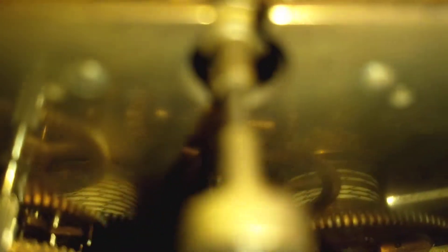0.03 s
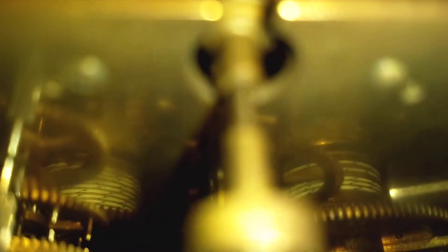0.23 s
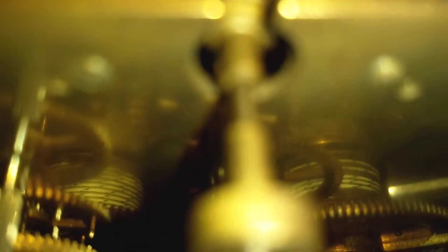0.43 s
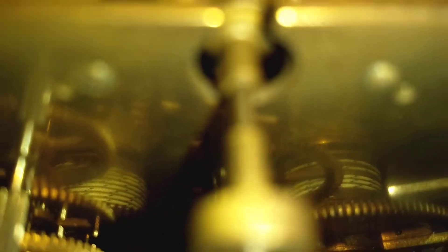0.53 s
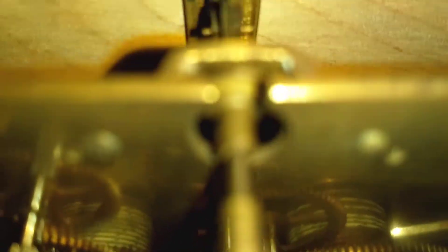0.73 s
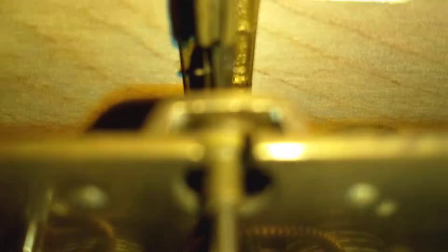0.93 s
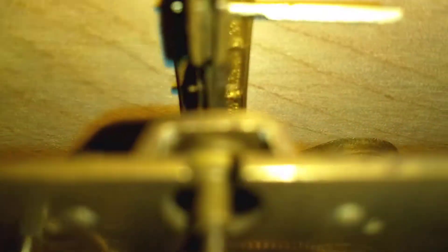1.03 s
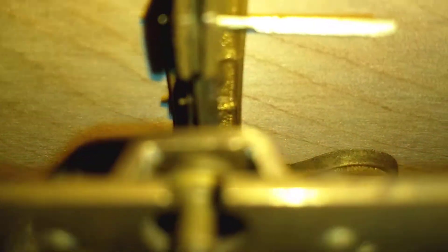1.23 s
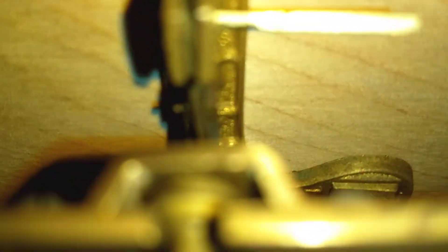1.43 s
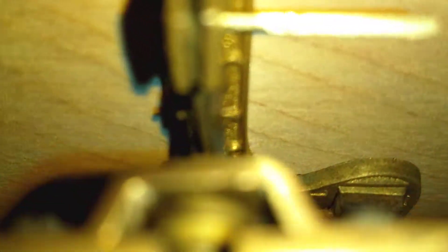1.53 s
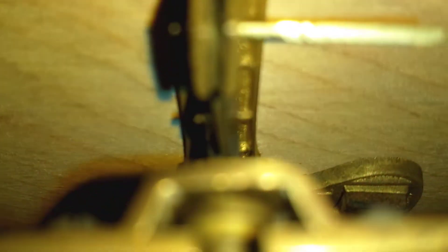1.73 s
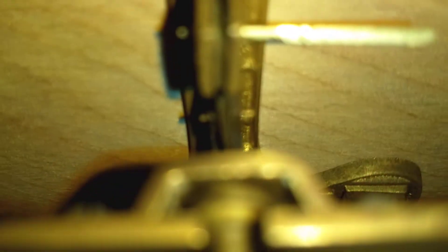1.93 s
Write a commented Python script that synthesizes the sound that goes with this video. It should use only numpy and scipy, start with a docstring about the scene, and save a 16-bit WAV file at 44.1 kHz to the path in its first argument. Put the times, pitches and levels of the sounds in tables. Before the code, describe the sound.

Sharp, slow metallic clockwork ticks among small knocks and hissing scrapes from handling.

```python
"""Brass clock in the hand

A small brass movement ticks up close: each beat is a tooth sliding on the pallet and landing with a
crack that rings the metal. Between beats the wheels click lightly and a thin spring sings. Handling
adds bumps that dive in pitch and run into hissing scrapes, all over a bed of low hum and hiss.
Close sounds reach the left channel inverted and a little late; the hum is alike on both sides."""
import sys
import numpy as np
from scipy.fft import rfft, irfft, next_fast_len
from scipy.io import wavfile
from scipy.ndimage import map_coordinates

SR = 44100
rng = np.random.default_rng(int(sys.argv[2]) if len(sys.argv) > 2 else 0)


def inscribe(sig):
    """Save sig as 16-bit PCM at rate SR to the path in sys.argv[1].

    A 1-D sig is mono; a 2-D sig holds one channel per row.
    Samples are clipped to [-1, 1] before scaling.
    """
    pcm = np.round(np.clip(np.atleast_2d(sig).T, -1, 1) * 32767)
    wavfile.write(sys.argv[1], SR, pcm.astype(np.int16))


N = 88200

# partials of the hum (f/Hz, rms level/dB, phase wander/rad)
HUM_PARTIALS = [(120.9, -62.5, 0.12), (171.9, -62, 0.091), (260, -68.5, 1.1), (288, -69.5, 0.48),
                (336.6, -73, 0.88), (429.3, -70, 1.17)]
# low room tone (f/Hz, level/dB)
ROOM_EQ = [(40, -43), (100, -0.5), (160, 0), (280, 4), (400, -7.5), (620, -4.5), (850, -9), (1300, -18.5),
           (2100, -99), (8000, -31)]
# steady hiss bed (f/Hz, level/dB)
BED_EQ = [(20, -3), (35, -21), (55, 4), (85, 2), (150, 0), (400, -12), (1300, -14), (2100, -19.5),
          (2600, -18), (4500, -20.5), (8000, -23.5), (15500, -26.5)]
# light clicks of the wheels (t/s, level/dB, t60/s)
WHEEL_CLICKS = [(.001, -52, 0.3), (0.2072, -45.5, 0.2), (0.491, -45.5, 0.16), (1.018, -45, 0.087),
                (1.5135, -45, 0.1), (1.528, -55, 0.27), (1.666, -53.5, 0.2)]
# colour of those clicks (f/Hz, level/dB)
WHEEL_EQ = [(200, -20), (900, -9), (1200, -4.5), (1400, 2), (1650, -3.5), (2000, -7), (2250, -20),
            (2600, 3.5), (3200, -18), (5000, -29), (14000, -39)]
# peaks of the spring's singing (t/s, level/dB)
SPRING_SWELLS = [(0.052, -55), (.548, -54.5), (1.025, -51), (1.095, -53.5), (1.59, -55)]
# beats of the escapement (t/s, frame level/dB, anchor level/dB, pallet level/dB, crack level/dB)
ESCAPEMENT_BEATS = [(.2248, -28.5, -28.5, -44, -36.5), (0.9717, -29.5, -26.5, -45.5, -31),
                    (1.7, -30, -29, -43, -35.5)]
# a tooth sliding on the pallet (f/Hz, level/dB)
SLIDE_EQ = [(1000, -1), (4000, 6), (9000, -17), (15000, -11)]
# high ring of the steel pallet (f/Hz, level/dB, t60/s)
PALLET_MODES = [(8500, -9, 0.029), (9100, -6, 0.028), (11180, -3.5, 0.056), (12300, -6, 0.034),
                (14200, -16, 0.18)]
# crack of the tooth landing (f/Hz, level/dB)
CRACK_EQ = [(200, -3), (700, -10.5), (1200, 1.5), (2000, -0.5), (2700, 16), (4200, -19.5), (5500, -4),
            (9000, -17), (16000, -22)]
# ring of the anchor; the lowest two modes beat (f/Hz, level/dB, t60/s)
ANCHOR_MODES = [(2452, 4.5, 0.049), (2640, 2, 0.014), (2877, -20, 0.061), (3240, -17.5, 0.058),
                (3554, -16.5, 0.077), (4350, -22.5, 0.049)]
# ring of the brass frame (f/Hz, level/dB, t60/s)
FRAME_MODES = [(953, -9.5, 0.051), (1154, -4.5, 0.079), (1204.6, -11.5, 0.14), (1498, -9.5, 0.081),
               (1725, -19.5, 0.084), (2036, -18, 0.068)]
# the case ringing on after a beat (f/Hz, level/dB)
CASE_EQ = [(200, -60), (1000, -16), (1400, 5.5), (1750, 1), (2200, -28.5), (2550, 6), (3200, -12),
           (5000, -23), (14000, -22)]
# handling scrapes (t/s, rise/s, time until the fade/s, t60/s, hiss level/dB, rasp level/dB)
SCRAPE_STROKES = [(0.2304, 0.0014, .011, .04, -41.5, -34.5), (0.425, 0.0031, 0.059, 0.035, -38, -37),
                  (0.558, 0.0016, 0.032, 0.22, -41.5, -40), (0.567, 0.031, 0.062, 0.25, -33.5, -52.5),
                  (0.698, 0.034, 0.12, 0.098, -45, -63.5), (0.866, 0.047, 0.049, 0.14, -55, -82),
                  (1.036, 0.0016, 0.012, 0.043, -51.5, -51), (1.051, 0.0012, 0.0032, 0.21, -38, -52),
                  (1.325, 0.0017, 0.0028, 0.16, -55, -58), (1.337, 0.051, 0.046, .14, -45, -57.5),
                  (1.434, .02, 0.034, 0.18, -60, -75), (1.745, 0.0026, .005, 0.16, -50.5, -56),
                  (1.763, 0.0078, .02, 0.54, -61, -60), (1.95, 0.035, 0.056, .1, -57.5, -80)]
# fine hiss of a scrape (f/Hz, level/dB)
SCRAPE_EQ = [(200, -29), (2000, -22), (3300, -1), (4500, 2), (5400, 2), (6500, 2.5), (8500, 5.5),
             (9700, -5.5), (11500, -11), (15500, -15)]
# lower rasp of a hard scrape (f/Hz, level/dB)
RASP_EQ = [(60, -5.5), (200, -1.5), (850, -0.5), (1500, -5.5), (2500, -5.5), (4000, -13.5), (8000, -11.5),
           (16000, -29)]
# handling bumps (t/s, level/dB, first f/Hz, last f/Hz, glide/s, t60/s, snap level/dB, spike level/dB)
HANDLING_BUMPS = [(.234, -19.5, 785, 98, .001, 0.018, -19.5, -12.5),
                  (0.4239, -15.5, 833, 165, 0.0011, 0.018, -31, -34),
                  (.5603, -18.5, 690, 180, 0.00093, 0.024, -24.5, -28.5),
                  (1.0518, -22.5, 310, 52, 0.0049, 0.056, -27.5, -31.5),
                  (1.3205, -36, 1000, 150, 0.0014, 0.015, -38.5, -37.5)]
# snap at the front of a bump (f/Hz, level/dB)
SNAP_EQ = [(100, -7.5), (1300, -3), (3000, -5), (8000, -10.5), (10000, -21), (15000, -24)]
# stereo width: the noise each channel has to itself (f/Hz, level/dB)
WIDTH_EQ = [(100, 3), (800, 6), (1700, -3), (2150, -59), (2600, -5), (3500, 1), (4200, 4.5), (8500, 1),
            (10000, 3.5), (15500, 2)]
# duller tone of close sounds on the left (f/Hz, level/dB)
LEFT_EQ = [(100, -2.5), (1000, -0.5), (1900, -1), (2300, -1.5), (2700, 0), (3600, -2), (4800, -3),
           (8500, -6), (10500, -3.5), (12000, -3), (15500, -7)]

TICK_WIDTH_DB, HANDLING_WIDTH_DB = -4, -4.5


def amp(db):
    """Decibels to gain."""
    return 10 ** (np.asarray(db) / 20)


def since(s):
    """Seconds since time s, zero before it."""
    return np.maximum(np.arange(N) / SR - s, 0)


def decay(s, t60):
    """A hard attack at s, then a fall of 60 dB every t60 seconds."""
    return (since(s) > 0) * amp(-60 * since(s) / t60)


def wobble(rate):
    """A smooth random curve, rate knots a second."""
    return map_coordinates(rng.standard_normal(int(N * rate / SR) + 4), [np.arange(N) * rate / SR])


def eq_gain(eq, hz):
    """Gain of an EQ curve drawn on a log frequency axis."""
    freqs, db = np.transpose(eq)
    return amp(np.interp(np.log(hz + 1), np.log(freqs + 1), db))


def filtered(x, response):
    """Shape x with a complex frequency response."""
    size = next_fast_len(N + SR // 2)
    return irfft(rfft(x, size) * response(np.fft.rfftfreq(size, 1 / SR)), size)[..., :N]


def noise(eq, width_db):
    """Coloured stereo noise of rms 1; width_db turns up the part the channels do not share."""
    own = filtered(rng.standard_normal((2, N)), lambda hz: amp(width_db) * eq_gain(WIDTH_EQ, hz))
    coloured = filtered(rng.standard_normal(N) + own, lambda hz: eq_gain(eq, hz))
    return coloured / np.sqrt(np.mean(coloured ** 2) + 1e-20)


def room():
    """A slightly unsteady hum over low room tone."""
    hum = sum(amp(db) * np.sqrt(2) * np.sin(2 * np.pi * hz * since(0) + wander * wobble(12))
              for hz, db, wander in HUM_PARTIALS)
    return hum + amp(-58.5) * noise(ROOM_EQ, width_db=-12)


def hiss_bed():
    """A soft, steady hiss with a full low end."""
    return amp(-55.5) * noise(BED_EQ, width_db=-15)


def wheels():
    """Light clicks of the wheels rattle the case."""
    return noise(WHEEL_EQ, TICK_WIDTH_DB) * sum(amp(db) * decay(s, t60) for s, db, t60 in WHEEL_CLICKS)


def spring(pitch_hz=1390, swell_s=0.017):
    """A thin spring sings one wavering note in brief swells."""
    t = since(0)
    swells = sum(amp(db) * np.exp(-((t - s) / swell_s) ** 2) for s, db in SPRING_SWELLS)
    return swells * np.sin(2 * np.pi * pitch_hz * t + 1.1 * wobble(70))


def ring(modes, s, attack_s=0.001):
    """Metal struck at s: damped modes, balanced a little differently on each hit."""
    t = since(s)
    tones = sum(amp(db + rng.normal()) * decay(s, t60) * np.sin(2 * np.pi * hz * t)
                for hz, db, t60 in modes)
    return tones * (1 - np.exp(-t / attack_s))


def escapement(lead_s=0.0019):
    """A tooth slides on the pallet, then lands with a crack that rings the anchor, frame and case."""
    crack, case, slide = (noise(eq, TICK_WIDTH_DB) for eq in (CRACK_EQ, CASE_EQ, SLIDE_EQ))
    out = np.zeros((2, N))
    for s, frame_db, anchor_db, pallet_db, crack_db in ESCAPEMENT_BEATS:
        out += amp(crack_db - 3) * slide * decay(s - lead_s, t60=0.022)
        out += amp(pallet_db) * ring(PALLET_MODES, s - lead_s)
        out += amp(crack_db) * crack * decay(s, t60=0.025)
        out += amp(anchor_db) * ring(ANCHOR_MODES, s)
        out += amp(frame_db) * ring(FRAME_MODES, s)
        out += amp(frame_db - 13.5) * case * decay(s, t60=0.21)
    return out


def scrapes():
    """Each stroke rises, holds and fades: a grainy hiss, with rasp and fizz when it presses hard."""
    hiss_env, rasp_env = np.zeros(N), np.zeros(N)
    for s, rise, length, t60, hiss_db, rasp_db in SCRAPE_STROKES:
        stroke = np.minimum(since(s) / rise, 1) * amp(-60 * since(s + length) / t60)
        hiss_env = np.hypot(hiss_env, amp(hiss_db) * stroke)  # overlaps add in power
        rasp_env = np.hypot(rasp_env, amp(rasp_db) * stroke)
    peak = hiss_env.max()
    fizz_env = amp(-5) * peak * (hiss_env / peak) ** 1.8  # louder strokes are brighter
    fizz = fizz_env * noise([(6000, -40), (11600, 0), (16000, -2)], width_db=6)
    grain = amp(0.5 * wobble(570))
    hiss = hiss_env * noise(SCRAPE_EQ, HANDLING_WIDTH_DB)
    rasp = rasp_env * noise(RASP_EQ, width_db=-11.5)
    return grain * (hiss + rasp + fizz)


def bumps(spike_s=0.00006):
    """Handling knocks: a spike and a snap on a thump whose pitch dives within milliseconds."""
    snap, out = noise(SNAP_EQ, HANDLING_WIDTH_DB), np.zeros((2, N))
    for s, db, first_hz, last_hz, glide, t60, snap_db, spike_db in HANDLING_BUMPS:
        t = since(s)
        cycles = last_hz * t + (first_hz - last_hz) * glide * (1 - np.exp(-t / glide))
        out += amp(spike_db) * t / spike_s * np.exp(1 - t / spike_s)
        out += amp(snap_db) * snap * decay(s, t60=0.0037)
        out += amp(db) * decay(s, t60) * np.sin(2 * np.pi * cycles)
    return out


def close_pickup(x, lag_s=0.000421):
    """Close sounds arrive inverted, late and duller on the left."""
    left = filtered(x[0], lambda hz: -eq_gain(LEFT_EQ, hz) * np.exp(-2j * np.pi * hz * lag_s))
    return np.array([left, x[1]])


def scene():
    """The movement and the handling up close over a hiss bed, in a humming room."""
    close = hiss_bed() + escapement() + wheels() + spring() + bumps() + scrapes()
    return close_pickup(close) + room()


def record(dry):
    """A brick-wall low-pass trims the very top."""
    return filtered(dry, lambda hz: hz < 15750)


dry = scene()
out = record(dry)
inscribe(out)
```